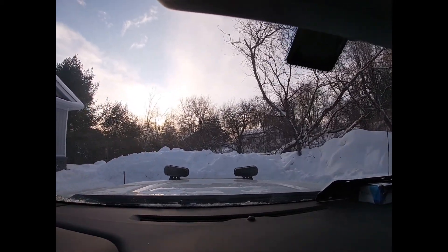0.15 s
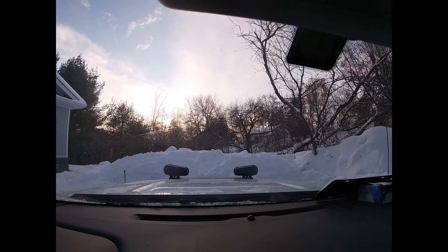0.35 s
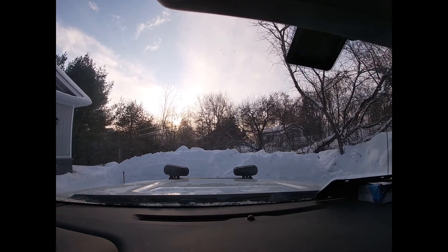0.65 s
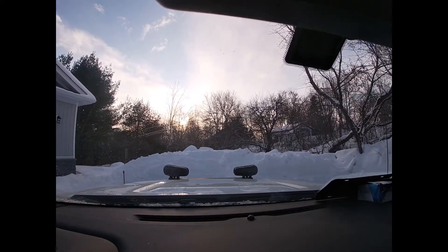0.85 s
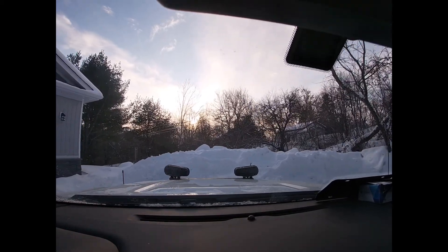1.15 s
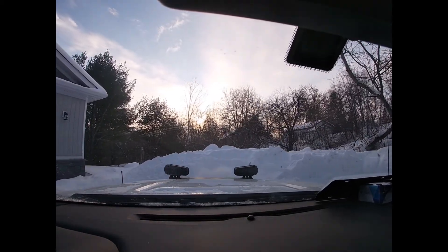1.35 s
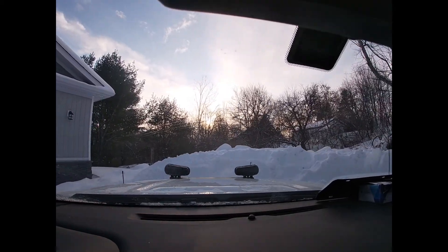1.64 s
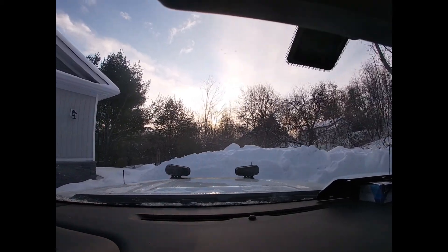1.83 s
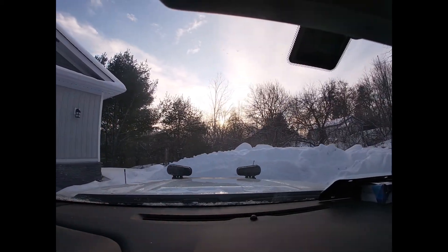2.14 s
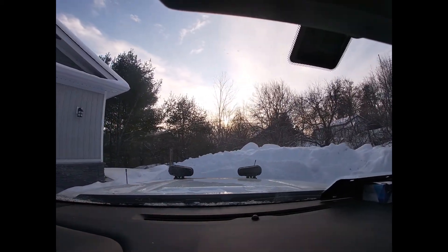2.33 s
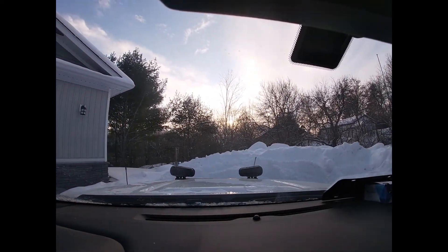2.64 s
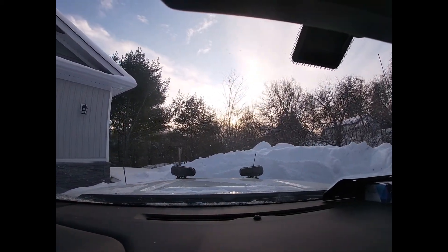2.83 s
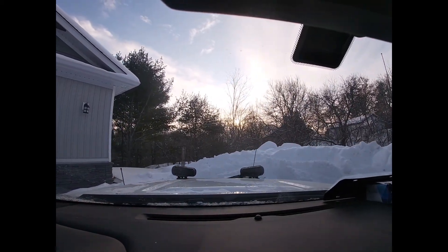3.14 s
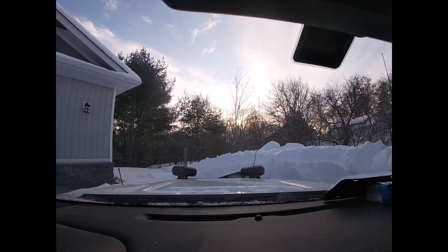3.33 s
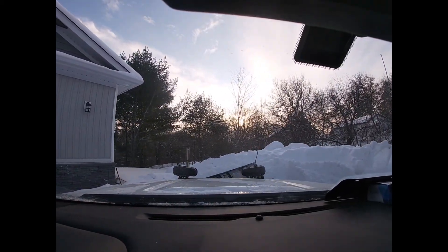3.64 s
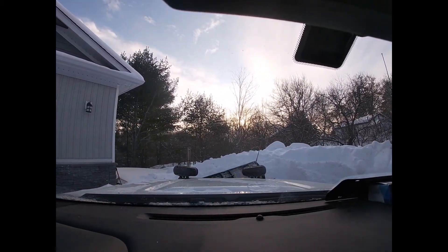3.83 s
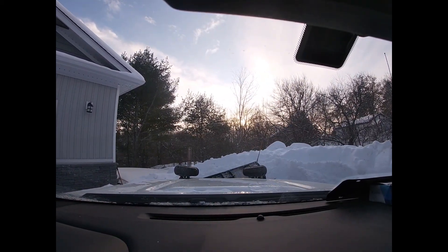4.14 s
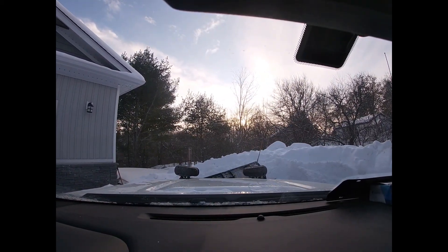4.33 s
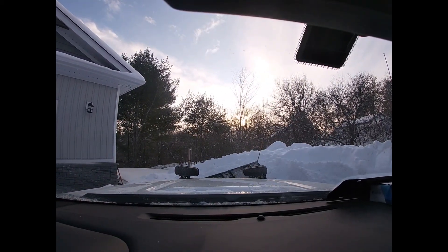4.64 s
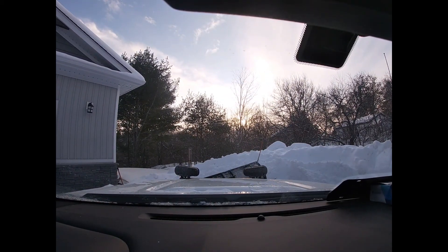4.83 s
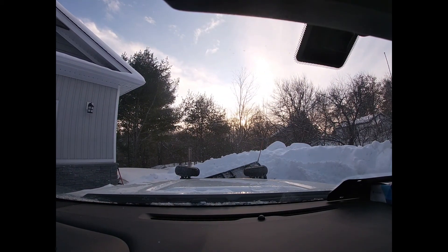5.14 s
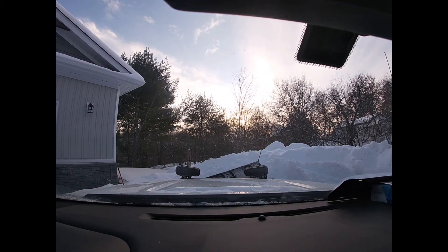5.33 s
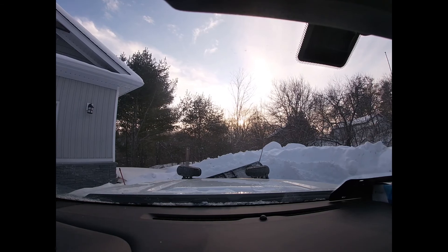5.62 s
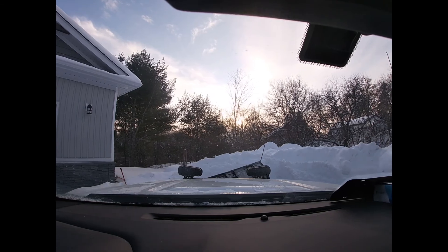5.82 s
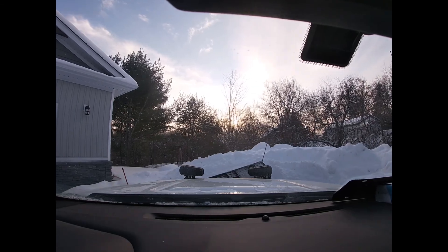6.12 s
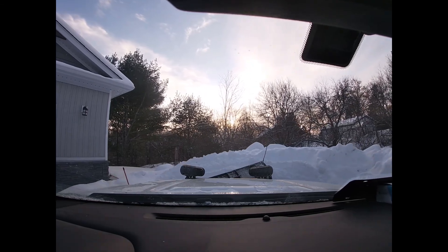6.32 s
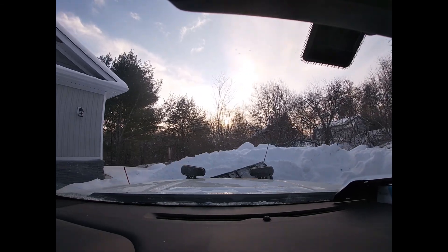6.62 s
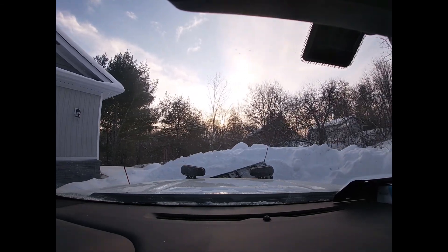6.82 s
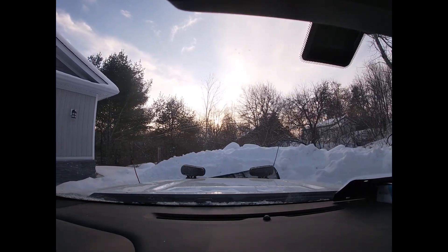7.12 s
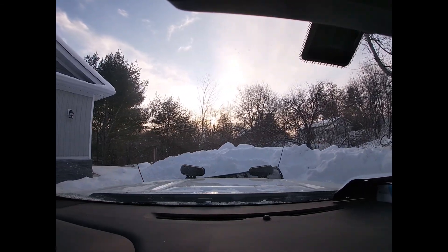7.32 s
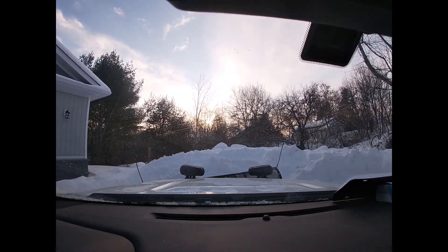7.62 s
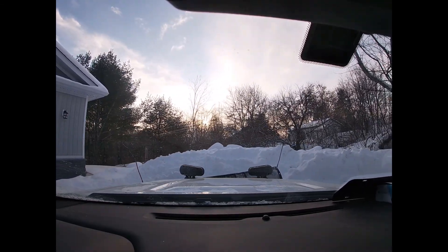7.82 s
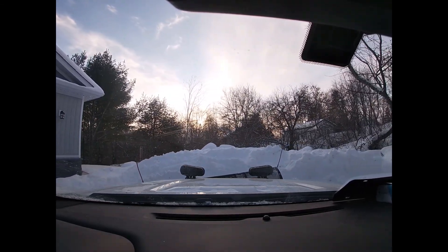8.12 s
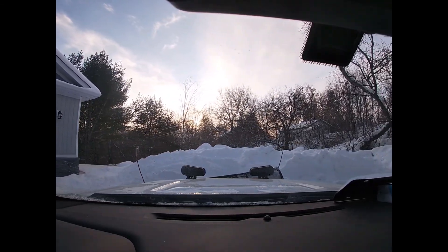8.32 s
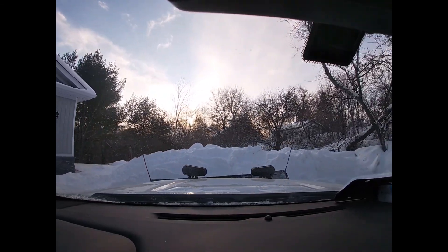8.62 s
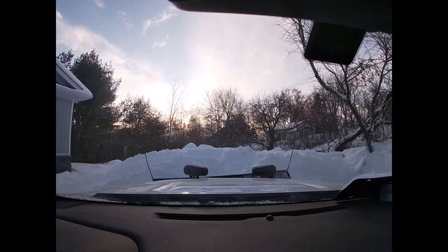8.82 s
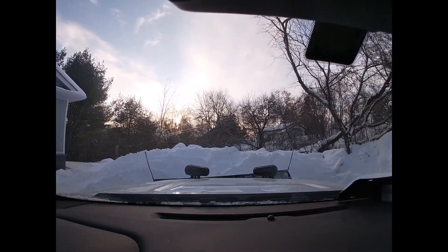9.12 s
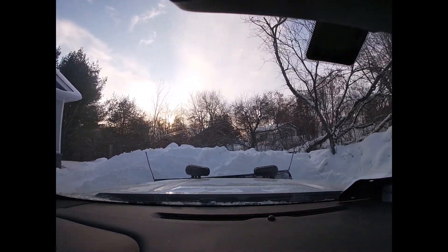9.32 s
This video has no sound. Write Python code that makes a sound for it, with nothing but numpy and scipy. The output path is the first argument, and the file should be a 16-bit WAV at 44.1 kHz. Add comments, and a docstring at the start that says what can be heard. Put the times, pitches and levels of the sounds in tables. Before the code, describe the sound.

Inside a small truck cab, a deep, shaking boom hits at 0 s over low engine growl and muffled drone, and a hard clack lands near 0.3 s. Uneven bass shudders continue as the truck creeps over packed snow. A quick, singing sleeve swish comes around 0.9 s, then a sharp multiple clack with thuds and faint metal ringing near 1.8 s. Soft knocks fall at 2.8, 3.2 and 3.7 s while the rumble gradually eases. Bright clicks and thuds cluster from 4.1 to 4.6 s; a glove creaks and cloth rubs around 5 s. A throttle burst lifts a humming engine note from about 5.2 s, peaking near 5.7 and sinking by 6.4. Heavy shaking returns around 7 s, with a bright metallic tick at 7.2 and knock at 7.3. Double knocks come at 8.4 and 8.6 s, and a sleeve brushes at 9.1 as rumbling continues. Echoes are short, treble slightly dull.

```python
"""A deep, shaking boom comes first, over a low engine growl, and soon a hard clack: a plow truck's cab.
The truck creeps over packed snow. Jolted resonances and gliding hums make the boom, shaped noise makes
the engine, and paired sine tones make one engine note. Sleeves and a glove are noise that swells and fades.
Switches, trim and the gear lever click and knock as ringing modes; small metal parts tinkle. The cab
adds short echoes, and a limiter and a dull microphone shape the whole sound."""
import sys
import numpy as np
from scipy import signal
from scipy.fft import rfft, irfft, next_fast_len
from scipy.io import wavfile
from scipy.ndimage import uniform_filter1d, minimum_filter1d, map_coordinates

SR = 44100
rng = np.random.default_rng(int(sys.argv[2]) if len(sys.argv) > 2 else 0)


def bounce(signal):
    """Save signal as a 16-bit WAV file at the path given by the first command-line argument."""
    frames = np.transpose(np.atleast_2d(signal))
    limited = np.clip(frames, -1, 1)
    pcm = np.round(limited * 32767).astype(np.int16)
    wavfile.write(sys.argv[1], SR, pcm)


N = 417186  # length in samples


def amp(db):
    """Turn a level in dB into a plain gain."""
    return 10 ** (np.asarray(db) / 20)


def unit(x):
    """Scale x to an rms (average strength) of 1."""
    return x / np.sqrt(np.mean(x ** 2) + 1e-20)


def along(points, hz):
    """Read a curve of (pitch_hz, value) points, spacing pitch by ratio as the ear does."""
    point_hz, values = np.transpose(points)
    return np.interp(np.log(hz + 1), np.log(point_hz + 1), values)


def curves(rows):
    """Draw each column after the time as a curve with one value per sample."""
    times, *columns = np.transpose(rows)
    return [np.interp(np.arange(N) / SR, times, column) for column in columns]


def wobble(rate):
    """A smooth random curve through `rate` random points a second."""
    points = rng.standard_normal(int(N * rate / SR) + 4)
    return map_coordinates(points, [np.arange(N) * rate / SR])


def filtered(x, response):
    """Shape x by a gain for each frequency, with spare room for the ringing."""
    m = next_fast_len(x.shape[-1] + 8192)
    spectrum = rfft(x, m) * response(np.fft.rfftfreq(m, 1 / SR))
    return irfft(spectrum, m)[..., :x.shape[-1]]


def modes(table):
    """Add up resonances, each a peak at its own pitch that rings after a push."""
    def response(f):
        total = 0
        for k, (hz, width, db) in enumerate(table):
            peak = 1j * f * width / (hz * hz - f * f + 1j * f * width)
            total = total + (-1) ** k * amp(db) * peak  # neighbours take opposite signs
        return total
    return response


def rush(spectrum, patchy_db):
    """Noise of rms 1 whose loudness varies in random patches of time and pitch."""
    z = signal.stft(rng.standard_normal(N + 512), nperseg=512)[2]
    over_pitch = uniform_filter1d(rng.standard_normal(z.shape), size=5, axis=0)
    patches = uniform_filter1d(over_pitch, size=10, axis=1)
    x = signal.istft(z * amp(patchy_db * unit(patches)), nperseg=512)[1][:N]
    return unit(filtered(x, lambda hz: amp(along(spectrum, hz))))


def stroke(s, hold, db, swell, fade):
    """A gain that swells, holds and fades at steady rates in dB per second."""
    t = np.arange(N) / SR
    before = np.clip(s - t, 0, None)
    after = np.clip(t - s - hold, 0, None)
    return amp(db - swell * before - fade * after)


# How long the cab's echo takes to fall by 60 dB: pitch_hz, fall_s
CAB_FALL = [(300, 0.056), (1500, 0.075), (5000, 0.06), (11000, 0.035)]


def cab(x):
    """Glass and seats return a short echo; its noise pattern is drawn anew each quarter second."""
    out, hop = np.zeros(N + SR), SR // 4
    for start in range(0, N, hop):
        hz, t, z = signal.stft(rng.standard_normal(SR // 6), SR, nperseg=128)
        decay = amp(-60 * t / along(CAB_FALL, hz)[:, None])
        tail = signal.istft(z * decay, SR, nperseg=128)[1]
        wet = signal.fftconvolve(x[start:start + hop], tail / np.linalg.norm(tail))
        out[start + 90:][:len(wet)] += wet  # the echo starts 90 samples late
    return out[:N]


# How hard the snow ruts shake the truck: start_s, chassis_db, cab_db, floor_pan_db
SHAKING = [(0.0, -12, -21, -19.5), (0.31, -22, -23.5, -25), (0.63, -21.5, -17.5, -26),
           (1.08, -20.5, -20.5, -19), (1.37, -19, -21, -20), (1.79, -23, -23.5, -27),
           (2.03, -15.5, -22.5, -28), (2.29, -17.5, -18, -21.5), (2.63, -21, -26.5, -30),
           (3.5, -21.5, -23, -29.5), (3.74, -22.5, -27.5, -29.5), (4.66, -24.5, -21.5, -32),
           (5.03, -27, -36, -33.5), (5.51, -30, -25.5, -30), (6.08, -28.5, -23, -25.5),
           (6.66, -20.5, -24.5, -19.5), (7.01, -14, -25.5, -25), (7.43, -19, -17.5, -27),
           (7.85, -15.5, -22.5, -28.5), (8.219, -18, -22.5, -23.5), (9.04, -18.5, -24.5, -24),
           (9.46, -20, -21.5, -27)]
# Springs, body, cab air, doors, floor pan, tyres: pitch_hz, width_hz, level_db relative to the shaking
# Each pair of rows follows one shaking column, in order.
BODY_BOOMS = [(23.5, 10.6, -3.5), (38.66, 11.4, 0.5), (61.1, 15, 1), (80.7, 14.1, -5.5),
              (107.44, 19.7, 1.5), (139.4, 21.5, -5.5)]
RUT_DB, RUTS_PER_S = 2, 7  # size of each resonance's own swells, and random points a second


def shell():
    """Random jolts keep each low resonance ringing, with its swells partly evened out."""
    out = np.zeros(N)
    for (hz, width, db), shake_db in zip(BODY_BOOMS, np.repeat(curves(SHAKING), 2, axis=0)):
        resonance = modes([(hz, 1.5 * width, 0)])
        # Passing the resonance twice narrows it again, back to about the listed width.
        ring = filtered(rng.standard_normal(N), lambda f: resonance(f) ** 2)
        swell = np.sqrt(np.abs(uniform_filter1d(unit(ring) ** 2, size=4000)))
        steadier = unit(ring / (swell + 0.5) ** 0.7)
        out += amp(db + shake_db + RUT_DB * wobble(RUTS_PER_S)) * steadier
    return out


# Spells when the engine holds a resonance on a hum:
# start_s, length_s, start_hz, end_hz, level_db (before the lift and wavering below)
ENGINE_HUMS = [(0, 0.27, 93, 91.4, -16.5), (0.301, 1.16, 60.24, 63, -18), (0.4, 0.45, 80.1, 83.5, -20),
               (.87, 0.62, 143.3, 140, -22), (.95, .4, 112, 104, -23), (1.38, 0.37, 103, 108, -19.5),
               (2, .45, 56, 60, -21.5), (2, .4, 112, 118, -25), (4, .38, 110, 112, -27.5),
               (1.25, 0.5, 99.1, 101, -22), (1.9, 0.55, 37.2, 37.13, -14.5), (2.5, 0.44, 36.44, 37.4, -11),
               (2.5, 0.28, 29.3, 36.5, -13), (3.5, 1.06, 37.88, 39.46, -23.5), (4, 0.35, 60, 63.7, -11.5),
               (4.452, 0.45, 57, 56.6, -23), (4.502, 0.475, 64.34, 65.2, -19),
               (5.35, 0.47, 56.8, 56, -17.5), (6, 1.27, 57.25, 55.52, -16), (6.5, 0.5, 116.2, 103.4, -15.5),
               (1.17, 0.29, 224.5, 217, -30), (0.5, 0.17, 186, 187.5, -28.5), (6.5, 0.4, 37.4, 37.5, -19.5),
               (6.697, 0.42, 38.27, 36.24, -16), (7, 0.64, 61.1, 60.4, -23), (7, 1.01, 34.2, 33.68, -17.5),
               (5.02, 0.38, 226, 234, -39), (6.5, 1.16, 74.4, 74.9, -26), (7.601, 0.85, 57.3, 60, -19),
               (7.5, .6, 41, 40, -22), (8, .5, 135, 112, -25.5), (8.65, .5, 108, 104, -24),
               (9.1, .36, 72, 74, -20), (8.679, 0.31, 61.8, 61.6, -13), (8.604, 0.8, 40.78, 41.2, -15.5)]


def hums():
    """Each hum is a sine that swells, glides in pitch and fades, with wavering loudness."""
    out = np.zeros(N + SR)
    for s, length, start_hz, end_hz, db in ENGINE_HUMS:
        u = np.arange(int(length * SR)) / (length * SR)  # runs from 0 to 1
        cycles = length * u * (start_hz + (end_hz - start_hz) * u / 2)
        tone = np.sin(2 * np.pi * (cycles + rng.random()))
        out[round(s * SR):][:len(u)] += amp(db + 3.5) * np.sin(np.pi * u) ** 0.58 * tone
    return out[:N] * amp(2.2 * wobble(9.3))


# Engine levels over time: start_s, drone_db, growl_db (the growl also gets lumps)
ENGINE_LEVELS = [(0.0, -41.5, -30.5), (1.0, -41.5, -30.5), (1.16, -41.5, -32), (2.85, -46, -36),
                 (3.77, -43, -35.5), (4.0, -39.5, -33.5), (4.77, -42, -34), (5.56, -38, -32.5),
                 (5.85, -39, -33), (6.38, -40, -29), (6.74, -40.5, -29.5), (7.06, -45, -33.5),
                 (8.85, -41.5, -30.5), (9.46, -42.5, -35)]
# Colour of the exhaust growl: pitch_hz, level_db per Hz (relative)
GROWL_COLOUR = [(140, -34.5), (170, -3.5), (220, 1.5), (255, -5), (310, -8.5), (380, -16.5), (450, -31),
                (520, -72)]
# Colour of the engine drone through the firewall: pitch_hz, level_db per Hz (relative)
DRONE_COLOUR = [(330, -38), (420, -0.5), (530, -3.5), (640, -0.5), (790, -4), (900, -10), (1010, -12),
                (1110, -8), (1240, -15), (1600, -11.5), (1800, -16.5), (2300, -23.5), (3500, -33),
                (7000, -53), (12000, -74)]


def engine():
    """Low noise is the exhaust, lumpy from uneven firing; higher noise drones through the firewall."""
    drone_db, growl_db = curves(ENGINE_LEVELS)
    lumps_db = 1.1 * wobble(13)
    growl = amp(growl_db + lumps_db) * rush(GROWL_COLOUR, 0.81)
    return growl + amp(drone_db) * rush(DRONE_COLOUR, 0.61)


# Path of the engine note, smoothed when played: start_s, pitch_hz
NOTE_PITCH = [(4.85, 177.1), (5.203, 198), (5.371, 209.3), (5.502, 226.8), (5.7, 238.9), (5.9, 236.9),
              (6.05, 228.2), (6.2, 211), (6.45, 203.8)]
# Loudness of the note: full_s, hold_s, level_db (before wavering), swell_db_per_s, fade_db_per_s
NOTE_SWELL = [(5.38, .72, -26, 25, 45)]
UNDERTONE_DB = -2.5  # average level of the half-pitch tone relative to the engine note


def engine_note():
    """An engine note and a tone at half its pitch rise and fall with a burst of throttle."""
    t = np.arange(N) / SR
    hz, = curves(NOTE_PITCH)
    inside = np.minimum(t - NOTE_PITCH[0][0], NOTE_PITCH[-1][0] - t)
    ends = np.clip(inside / 0.053, 0, 1)  # 53 ms ramps at both ends
    phase = 2 * np.pi * np.cumsum(uniform_filter1d(hz, size=4000)) / SR
    tone = amp(1.2 * wobble(8)) * np.sin(phase)
    undertone = amp(UNDERTONE_DB + 2.4 * wobble(5)) * np.sin(phase / 2)
    return ends * stroke(*NOTE_SWELL[0]) * (tone + undertone)


# Narrow singing bands in the cloth's weave: full_s, hold_s, start_hz, end_hz, level_db (before the grain)
WEAVE_BANDS = [(.89, .08, 3000, 3550, -56), (0.93, .12, 3200, 3800, -46), (.895, .05, 3800, 4250, -47),
               (.94, 0.11, 5400, 5400, -50), (0.83, .17, 6900, 5000, -62)]
GRAIN_PER_S, WEAVE_FADE_DB_PER_S = 350, 398  # random points a second; rate of swell and fade


def weave():
    """The weave sings as narrow noise: smooth random loudness on a sine that climbs, holds or falls."""
    out, t = np.zeros(N), np.arange(N) / SR
    for s, hold, start_hz, end_hz, db in WEAVE_BANDS:
        near = slice(round((s - .15) * SR), round((s + hold + .15) * SR))
        hz = np.interp(t[near], [s, s + hold], [start_hz, end_hz])
        points = rng.standard_normal(len(hz) // 50)
        grain = map_coordinates(points, [np.arange(len(hz)) * GRAIN_PER_S / SR])
        gain = stroke(s, hold, db, WEAVE_FADE_DB_PER_S, WEAVE_FADE_DB_PER_S)[near]
        out[near] += gain * grain * np.sin(2 * np.pi * np.cumsum(hz) / SR)
    return out


# Strokes of a sleeve: full_s, hold_s, rub_db, crisp_db (treble relative to the rub),
# swell_db_per_s, fade_db_per_s (rates of the rub; the treble moves faster)
SLEEVE_STROKES = [(0, 0.0081, -57, -6.5, 99, 100), (0.312, 0.081, -74.5, -11.5, 150, 38),
                  (0.527, 0.049, -70.5, -1.5, 52, 67), (0.726, 0.018, -54, 0.5, 60, 50),
                  (0.905, 0.16, -44.5, -4.5, 174, 298), (1.303, 0.092, -72, -9.5, 35, 81),
                  (1.607, .03, -72, -2, 86, 53.5), (1.963, 0.018, -49, -5, 102.5, 126),
                  (2.164, .02, -75, -12.5, 51, 72), (3.937, 0.017, -61, -4.5, 72, 59),
                  (4.065, 0.18, -59, -5.5, 92, 122), (4.52, .03, -73.5, 2.5, 78, 53),
                  (4.712, 0.03, -69, -5, 76, 36.5), (5.024, 0.18, -50.5, -2, 56.5, 66),
                  (5.46, 0.027, -66, -3, 37, 28), (6.095, .05, -64, -3.5, 20, 27.5),
                  (6.43, 0.018, -66, -6, 25, 32.5), (7.458, 0.11, -58, -2.5, 61.5, 37.5),
                  (7.967, 0.027, -59, -2, 31.5, 96), (8.67, 0.028, -67, -6, 73.5, 40),
                  (9.078, 0.23, -55, -2, 55.5, 52)]
# A glove creaks on the rim: full_s, hold_s, level_db, swell_db_per_s, fade_db_per_s
GLOVE_CREAKS = [(4.852, 0.25, -57.5, 152, 82)]
# Colour of the cloth's rub: pitch_hz, level_db per Hz (relative)
RUB_COLOUR = [(1500, -33), (2300, -9), (2900, -4.5), (3600, -5.5), (4200, -6.5), (4700, -6), (5300, -6),
              (6100, -7), (6700, -15.5), (7500, -48.5)]
# Colour of its crisp treble: pitch_hz, level_db per Hz (relative)
CRISP_COLOUR = [(5500, -47.5), (6400, -9.5), (7200, -3.5), (7900, -10), (8500, -9.5), (9500, -7.5),
                (10300, -14.5), (11200, -15.5), (15500, -31.5)]
# Colour of the glove's creak: pitch_hz, level_db per Hz (relative)
CREAK_COLOUR = [(2100, -44), (2500, -8), (2900, -3), (3300, -9), (3900, -41.5)]
REST_DB, REST_CRISP_DB = -75, -82.5  # the cloth's rub and treble at rest


def sleeves():
    """Stiff cloth slides on the wheel as noise; its fibres catch unevenly, so the loudness flutters."""
    rub, crisp = amp(REST_DB), amp(REST_CRISP_DB)
    for s, hold, db, crisp_db, swell, fade in SLEEVE_STROKES:
        rub = rub + stroke(s, hold, db, swell, fade)
        crisp = crisp + stroke(s, hold, db + crisp_db, 1.6 * swell, 1.28 * fade)
    creak = sum(stroke(*row) for row in GLOVE_CREAKS)
    catch_db = 1.2 * wobble(60) + 0.31 * wobble(300)
    cloth = rub * rush(RUB_COLOUR, 2.0) + crisp * rush(CRISP_COLOUR, 1.7)
    return amp(catch_db) * (cloth + creak * rush(CREAK_COLOUR, 1.5))


# Tinkles of small metal parts, such as keys:
# start_s, level_db (before onset and buzz), pitch_hz, fall_s (time to fall 60 dB), share of the neighbour
METAL_TINKLES = [(.268, -49, 6200, 0.015, .3), (1.769, -56, 10100, 0.17, 0), (1.769, -46, 8850, .04, 0),
                 (1.772, -43, 5500, 0.06, .1), (3.232, -57, 5740, 0.033, .5),
                 (4.098, -38, 3120, 0.07, 0.18), (4.5, -49, 5500, 0.094, .1), (6.598, -51, 4280, 0.03, 1),
                 (6.626, -41.5, 4260, 0.027, .8), (6.675, -45, 4370, 0.03, .8),
                 (6.745, -42.5, 4250, 0.03, 0.72), (7.199, -25.5, 4300, 0.016, 0.05),
                 (7.199, -36, 5830, 0.012, .1), (7.265, -44, 4150, 0.015, .3)]


def tinkles():
    """Each metal part starts clean, then buzzes loosely on a mode and its near neighbours above."""
    out, t = np.zeros(N + SR), np.arange(SR // 4) / SR
    for s, db, hz, fall, share in METAL_TINKLES:
        neighbours = np.sin(2 * np.pi * 1.2 * hz * t) + .3 * np.sin(2 * np.pi * 1.42 * hz * t)
        ring = np.sin(2 * np.pi * hz * t) + share * neighbours
        rough = uniform_filter1d(rng.standard_normal(len(t)), size=50)
        rough = unit(uniform_filter1d(rough, size=50))
        buzz = 1 + (1 - np.exp(-(t / .008) ** 2)) * rough
        onset = 1 - np.exp(-t / 0.00055)
        out[round(s * SR):][:len(t)] += amp(db - 60 * t / fall) * onset * ring * buzz
    return out[:N]


# Soft blows on the floor or lever:
# start_s, level_db (before the lift and onset below), pitch_hz, fall_s (time to fall 60 dB)
SOFT_BLOWS = [(1.765, -23, 345, 0.05), (1.787, -20.5, 330, 0.053), (1.81, -18.5, 212, 0.17),
              (2.269, -28, 215, 0.12), (2.772, -14.5, 192, 0.06), (2.775, -18.5, 282, 0.092),
              (3.78, -18.5, 215, 0.051), (4.1145, -19.5, 1240, 0.05), (4.3118, -23, 1200, 0.035),
              (4.321, -27.5, 1350, 0.055), (8.599, -36, 1400, 0.07), (4.121, -13.5, 337, 0.042),
              (4.32, -18, 287, 0.068), (4.491, -25, 347, 0.12), (4.727, -18, 307, 0.085),
              (6.209, -18, 241, 0.055)]


def thuds():
    """A soft blow rings a mode that dies fast, with a weaker neighbour above."""
    out, t = np.zeros(N + SR), np.arange(SR // 4) / SR
    for s, db, hz, fall in SOFT_BLOWS:
        ring = np.sin(2 * np.pi * hz * t) + 0.38 * np.sin(2 * np.pi * 1.2 * hz * t)
        onset = 1 - np.exp(-t / 0.0027)
        out[round(s * SR):][:len(t)] += amp(db + 3.5 - 60 * t / fall) * onset * ring
    return out[:N]


def chatter(shape):
    """Spiky noise: many small bumps and a few hard ones."""
    x = rng.standard_normal(shape)
    return x * np.abs(x)


# Clicks and clacks of switches, trim and lever: start_s, knock_db, rap_db, snap_db, tick_db, sizzle_db,
# contact_ms (levels are before the small lift and the boost for long contacts)
CLICKS = [(0.2823, -37, -32, -26, -34, -40, 1.2), (0.2841, -22.5, -28.5, -44, -43, -50, 3.4),
          (0.4025, -49, -50, -54, -48, -56, 0.74), (0.78, -45, -51, -54, -38, -47, 1.3),
          (1.208, -50, -55, -41, -35.5, -41.5, 2.5), (1.344, -50, -53, -47, -49, -57.5, 2.1),
          (1.7512, -40, -32, -21.5, -30, -35, 1.3), (1.7535, -23, -40, -42, -48, -56, 2.5),
          (1.7684, -40, -28, -39, -38, -44, 3.5), (1.7945, -32, -30, -31, -53, -61, 3.2),
          (1.805, -36, -39, -43, -52, -58, 2.1), (1.813, -39, -36, -42, -42, -50, 1.2),
          (2.218, -47, -55, -43, -41, -49, 1.7), (2.418, -41, -48, -55, -62, -70, 2.2),
          (2.563, -48, -48, -49, -52, -60, 1.6), (2.831, -48, -52, -48, -56.5, -68, 1.8),
          (3.167, -53, -59, -47, -58, -73, 5.5), (3.247, -27, -47, -30, -44, -55, 1.4),
          (3.707, -27.5, -26, -30.5, -58, -64, 5.8), (3.7267, -33, -47, -42, -41, -47, 0.86),
          (3.7444, -37, -43, -47, -48, -53.5, 2.9), (3.9562, -46, -53, -45, -41, -50, 1.9),
          (4.0955, -40, -35, -33, -37, -46, 1.1), (4.1156, -34, -31, -27, -24, -28, 5.6),
          (4.123, -42, -33, -35, -29, -32, 6), (4.313, -33, -32, -27, -26.5, -30, 5.4),
          (4.321, -42, -35, -34, -34, -35, 5.8), (4.499, -42, -33, -42, -44, -48, 2.5),
          (4.575, -45, -41, -27.5, -42, -50, 1.5), (4.581, -43, -42, -32, -31.5, -37.5, 2.2),
          (5.434, -42, -46, -41, -60, -70, 1.4), (5.672, -36, -44, -52, -62, -70, 1.8),
          (5.843, -52, -44, -44, -49, -57, 1.8), (6.1584, -43, -43, -43, -40, -44, 1.8),
          (6.695, -51, -56, -60, -49, -54, 2.1), (6.800, -38, -42, -50, -60, -68, 1.8),
          (6.8186, -30.5, -32, -34, -48, -57, 4.5), (7.1989, -49, -52, -40, -30, -31, 0.9),
          (7.2015, -52, -50, -35, -42, -42, 1.5), (7.282, -34, -30, -33, -53, -60, 3.5),
          (7.286, -27, -26.5, -33, -56, -62, 3.5), (7.304, -42, -37, -43, -56, -64, 3.2),
          (8.41, -32, -34, -31.5, -52, -62, 3.4), (8.414, -29, -34, -36, -52, -60, 3.1),
          (8.429, -50, -43, -48, -61, -67, 4.2), (8.576, -32, -32, -29, -52.5, -60, 3.2),
          (8.581, -24.5, -22.5, -29.5, -53, -62, 3.2), (8.599, -53, -38, -48, -65, -70, 5.2),
          (8.613, -53, -45, -58, -54, -57, 5.7), (9.1502, -35, -44, -60, -56, -68, 1.3)]
# What the trim rings with, from low to high; each table lists pitch_hz, width_hz, level_db (relative)
KNOCK_MODES = [(500, 100, -3.5), (785, 78, 6), (950, 180, -5.5)]
RAP_MODES = [(1075, 120, -6.5), (1284, 110, -2), (1350, 120, 1), (1650, 250, -4.5)]
SNAP_MODES = [(1967, 240, -5.5), (2334, 230, 1.5), (2730, 260, -0.5), (3180, 510, -5)]
TICK_MODES = [(3580, 470, -3), (4400, 900, 0), (5150, 800, 3), (6100, 700, 1.5)]
SIZZLE_MODES = [(6930, 530, -4.5), (8410, 800, -2.5), (9100, 1300, -3), (9720, 600, -0.5),
                (12900, 4800, -10)]
LEAD, LONG_DB_PER_MS = .15, 0.47  # share of the contact placed before its start; boost with length
DULL_CYCLES = 9  # sets how far a long contact dulls fast ringing
BLOW, BLOW_S = 1.5, .0007  # strength of the first blow before softening; its time to peak, s
SOFTENS = 0.55  # dB the blow loses per dB that the tick lies under the snap


def contacts():
    """Each contact presses, chatters and lets go, ringing five groups of trim modes."""
    out, t = np.zeros(N + SR), np.arange(SR // 10) / SR
    groups = (KNOCK_MODES, RAP_MODES, SNAP_MODES, TICK_MODES, SIZZLE_MODES)
    for s, *levels_db, ms in CLICKS:
        contact = max(ms, .3) * 1e-3  # seconds
        blow = BLOW * amp(SOFTENS * min(levels_db[3] - levels_db[2], 0))
        press = (t / contact * np.exp(1 - t / contact)) ** 1.8 / 3
        first_blow = blow * t / BLOW_S * np.exp(-t / BLOW_S)
        pushes = (press + first_blow) * chatter((len(levels_db), len(t)))
        start = round((s - LEAD * contact) * SR)
        for push, group, db in zip(pushes, groups, levels_db):
            low_hz, top_hz = 0.61 * group[0][0], 1.16 * group[-1][0]

            def response(f):
                """Keep the group's own pitch range and dull it by the contact's length."""
                band = (1j * f / (low_hz + 1j * f) * top_hz / (top_hz + 1j * f)) ** 4
                return modes(group)(f) * band / (1 + 1j * f * contact / DULL_CYCLES) ** 2

            ring = filtered(push, response)
            gain = amp(db + LONG_DB_PER_MS * ms + 0.6)
            out[start:][:len(t)] += gain * ring / np.abs(ring).max()
    return out[:N]


def scene():
    """Everything heard at the windscreen; only the clicks and tinkles get the cab's echo."""
    truck = shell() + hums() + engine()
    near = contacts() + tinkles()
    echo = amp(-10.5) * cab(near)
    return (truck + engine_note() + weave() + sleeves() + thuds() + near + echo)[None]


# How the microphone dulls the treble: pitch_hz, level_db
MIC_TREBLE = [(10300, 0), (11200, -8.5), (15700, -11)]
TOP_HZ = 15700  # above this pitch the sound is cut steeply


def record(dry):
    """A limiter turns down the loudest peaks; the microphone dulls the treble and cuts the very top."""
    need = np.minimum(1, 0.54 / (np.abs(dry) + 1e-9)) ** 0.75
    gain = minimum_filter1d(need, size=600)
    gain = uniform_filter1d(uniform_filter1d(gain, size=300), size=300)
    # Mirrored ends keep the filter from clicking at the edges.
    longer = np.pad(dry * gain, ((0, 0), (2048, 2048)), "reflect", reflect_type="odd")
    heard = filtered(longer, lambda hz: amp(along(MIC_TREBLE, hz)) / (1 + (hz / TOP_HZ) ** 60))
    return heard[:, 2048:-2048]


dry = scene()
out = record(dry)
bounce(out)
```